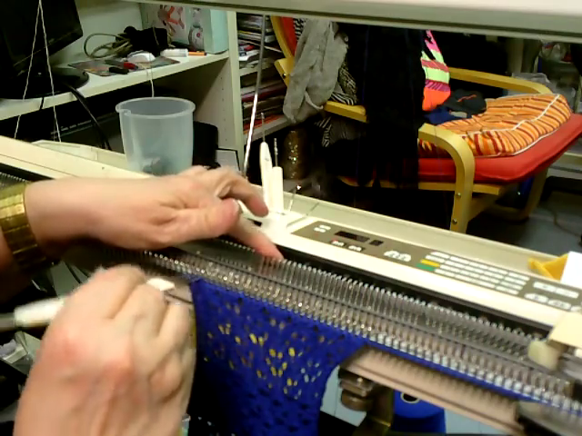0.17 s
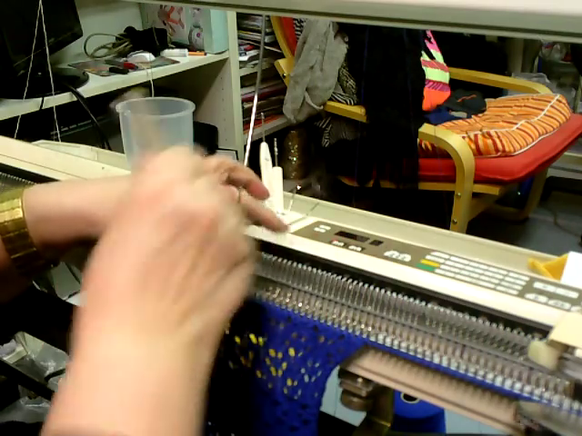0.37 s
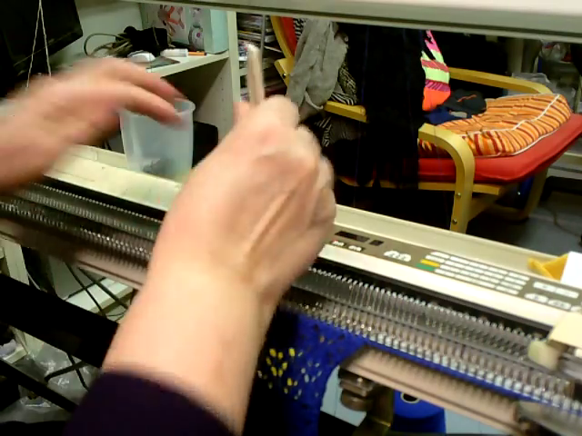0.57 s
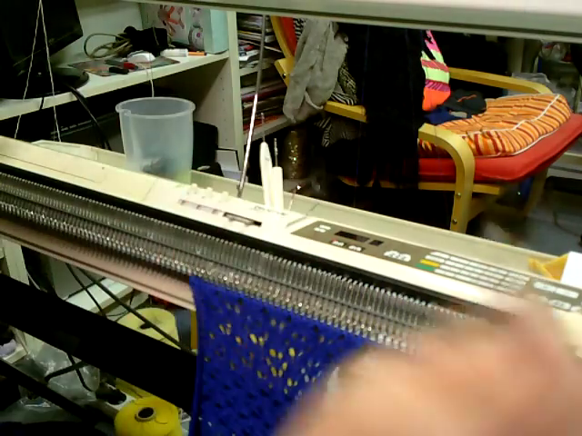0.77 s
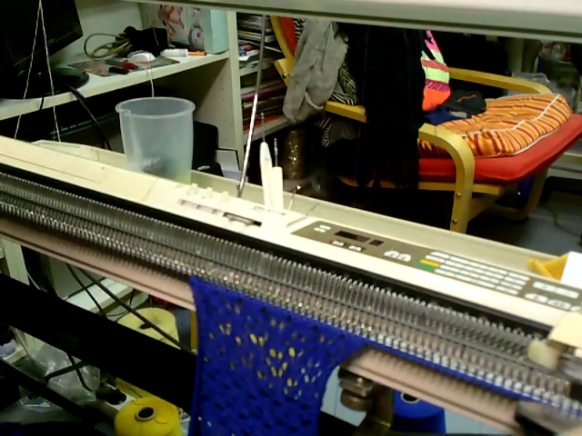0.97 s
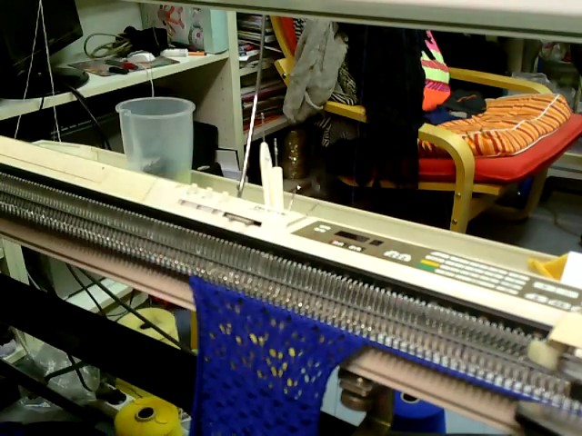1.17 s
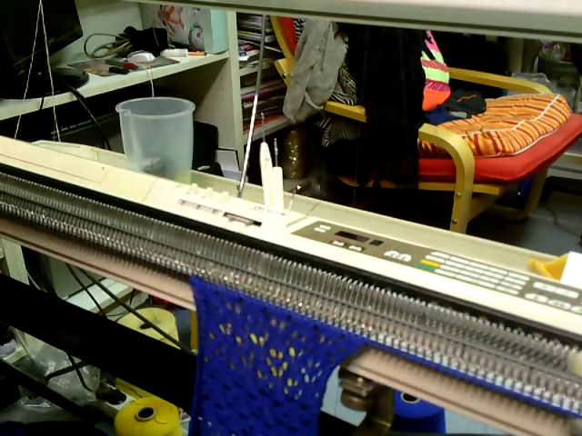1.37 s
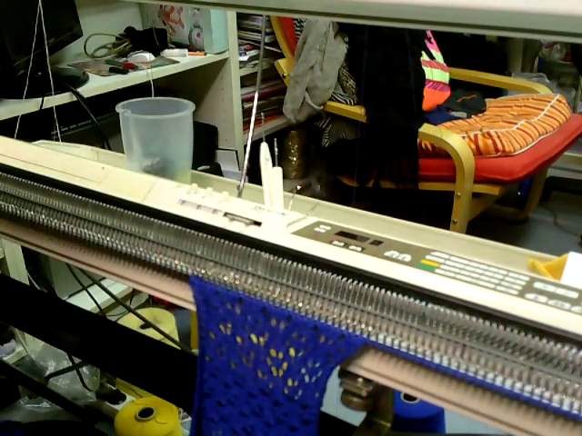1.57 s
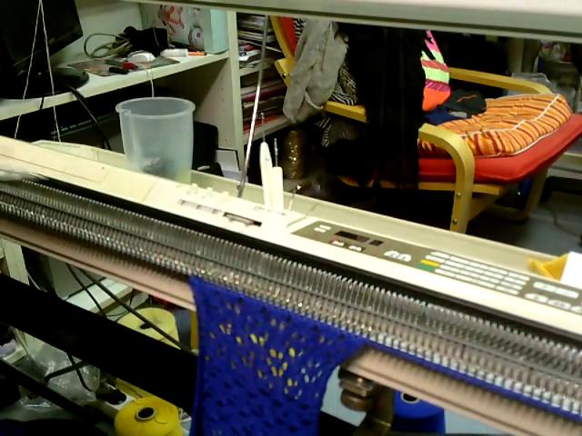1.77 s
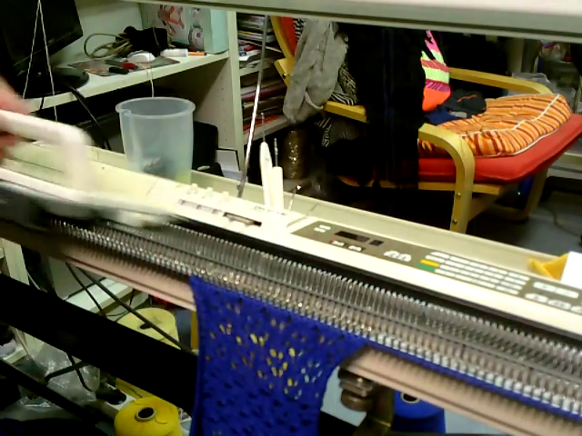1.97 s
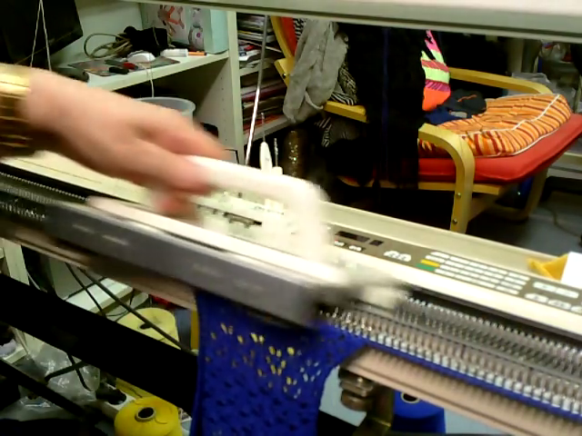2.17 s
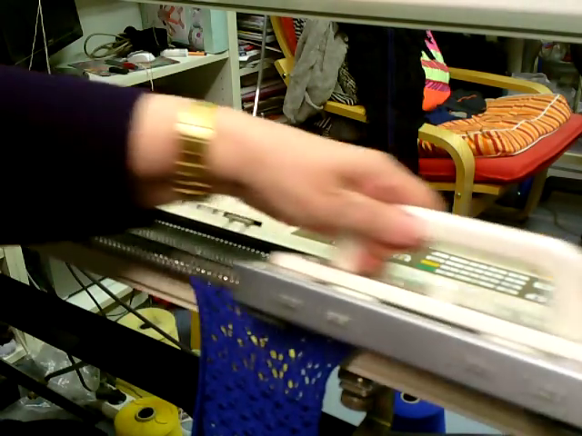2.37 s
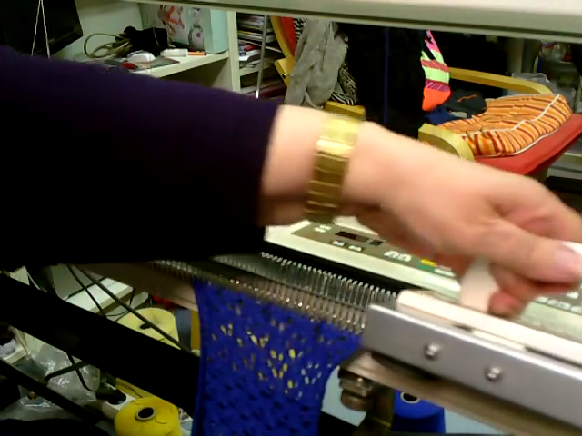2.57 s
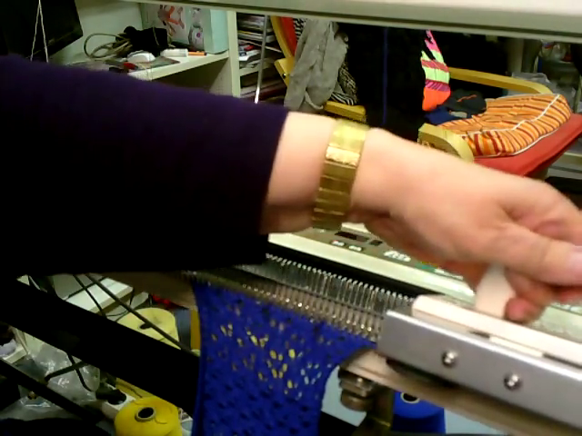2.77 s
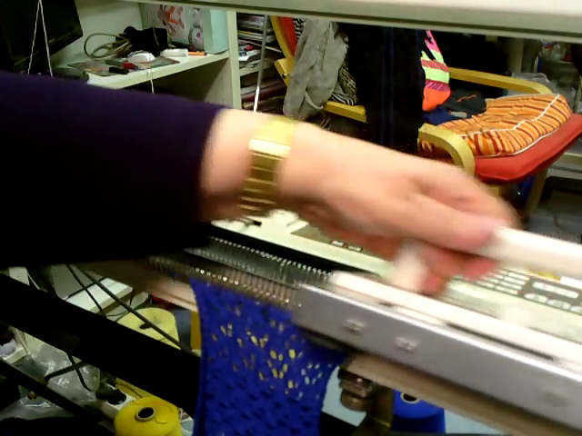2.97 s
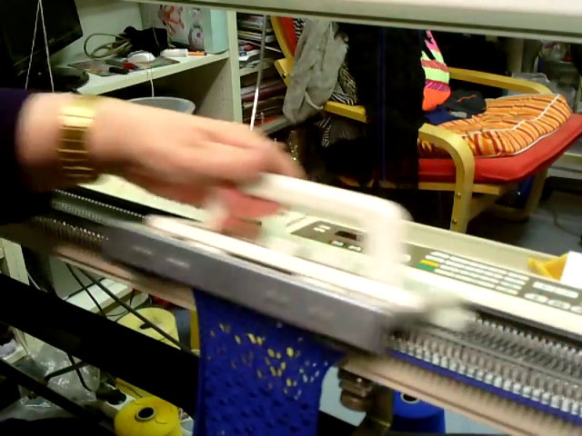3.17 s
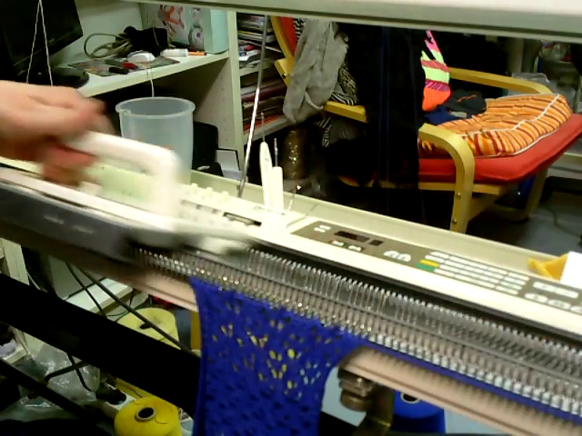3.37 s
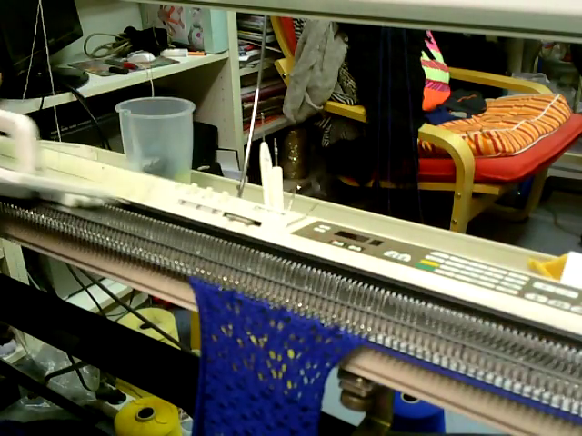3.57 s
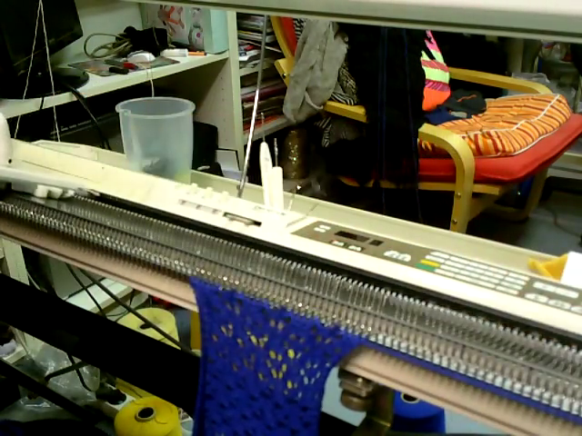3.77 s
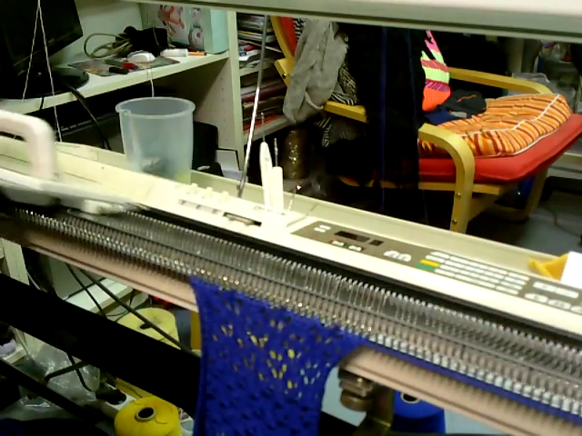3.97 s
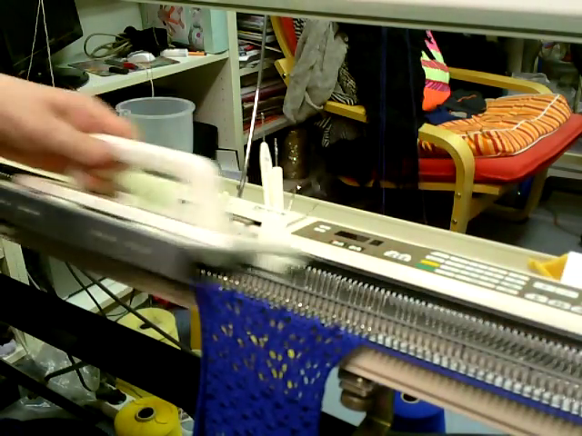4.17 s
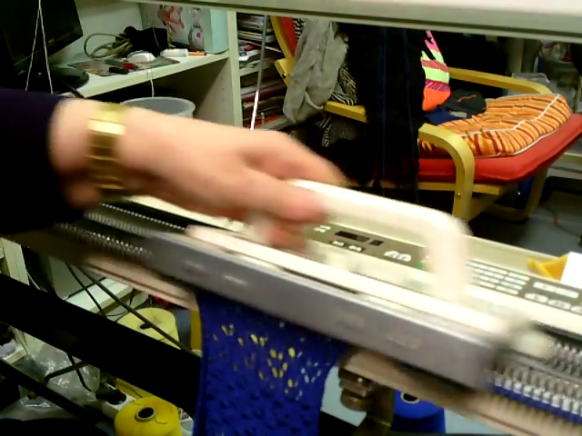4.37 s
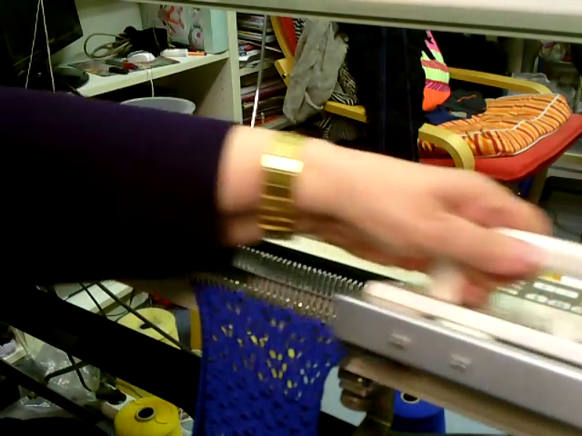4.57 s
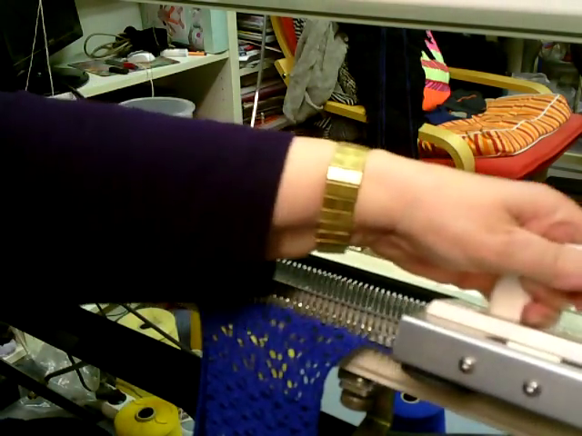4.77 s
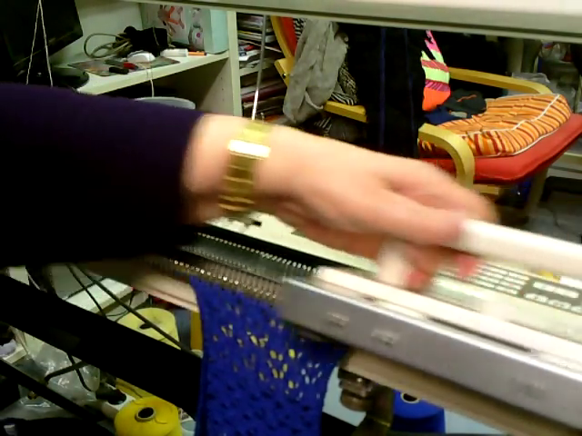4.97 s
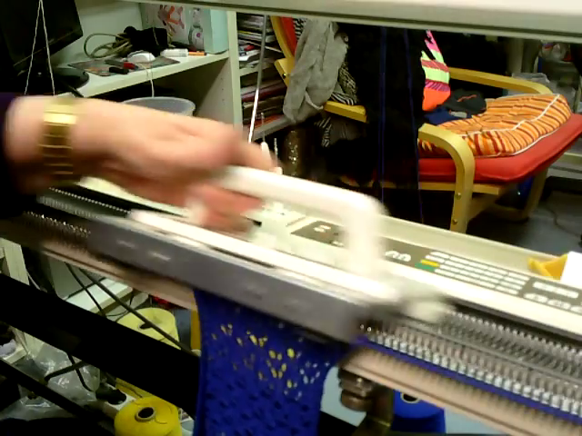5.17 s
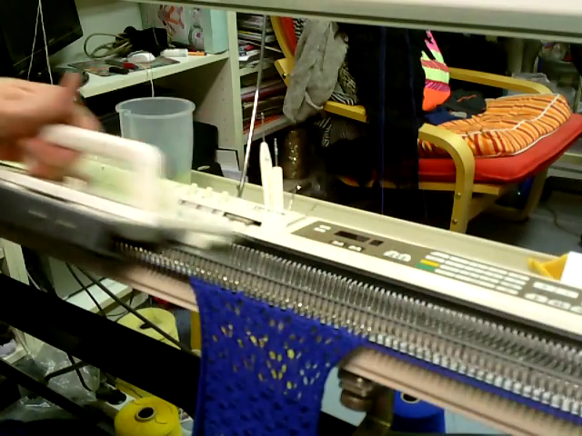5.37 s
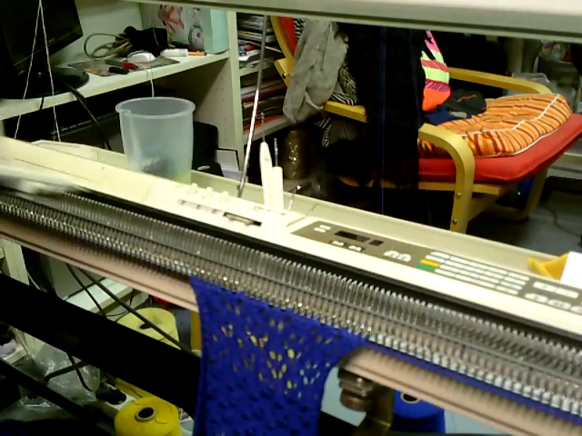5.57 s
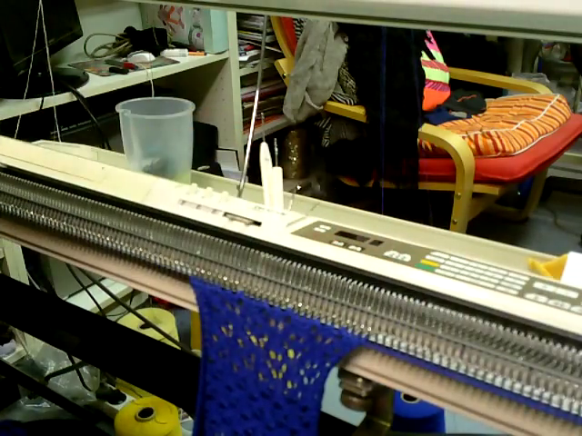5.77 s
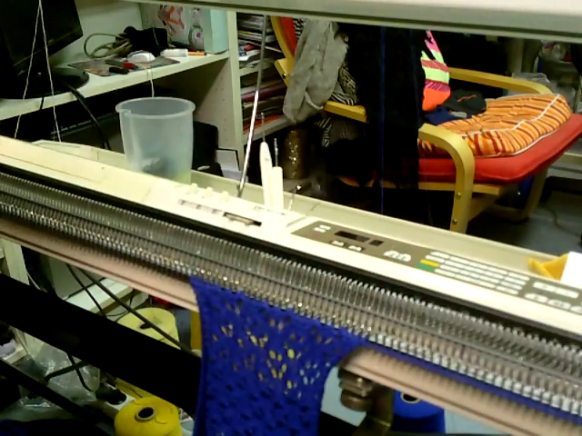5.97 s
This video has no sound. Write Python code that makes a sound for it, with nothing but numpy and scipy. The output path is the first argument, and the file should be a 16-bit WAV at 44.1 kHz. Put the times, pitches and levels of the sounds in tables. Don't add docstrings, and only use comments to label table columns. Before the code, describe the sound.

Close and dry indoors: a quiet hush, a faint woolly rustle, then the quick double clack of a tool being put down. A pause with barely audible ticks follows. Then a metal carriage scrapes and rattles across many steel needles, out, back, out faster and back again, buzzing at the needle rate, with bright latch clicks, jolts and dull knocks, before letting go to quiet.

```python
import sys
import numpy as np
from scipy import signal
from scipy.fft import rfft, irfft
from scipy.io import wavfile
from scipy.ndimage import uniform_filter1d, minimum_filter1d

SR = 44100
rng = np.random.default_rng(int(sys.argv[2]) if len(sys.argv) > 2 else 0)


def dump(signal):
    limited = np.clip(np.atleast_2d(signal).T, -1, 1)
    pcm = np.round(limited * 32767).astype(np.int16)
    wavfile.write(sys.argv[1], SR, pcm)


def nominal_scale(level):
    x = np.asarray(level, float) / 20
    return 10 ** x


N = 265903

# f/Hz, level/dB (per Hz)
NEEDLE_TONE = [(2350, -54), (4000, -4.5), (4470, -12), (5700, -2.5), (6250, 3), (8210, -3.5), (9220, -1),
               (12300, -2.5), (15400, -9), (15700, -15), (16000, -74)]
# f/Hz, level/dB (per Hz)
SCRAPE_TONE = [(760, -44), (1300, -2.5), (1440, -11), (1660, -6), (2130, -0.5), (3030, -1.5), (3350, -0.5),
               (4440, -12), (5000, -9), (6500, -5), (11000, -120)]
# f/Hz, level/dB (per Hz)
BED_TONE = [(24, -101), (40, -71), (81, -41.5), (167, -33), (214, -25), (280, -25), (322, -17), (383, -16),
            (477, -6.5), (663, -15), (813, -6), (894, -8), (1030, 1.5), (1360, -12), (1700, -13.5),
            (2210, -20), (3740, -120)]


def carriage():
    rattle_db, scrape_db, drone_db, rumble_db = minimum_filter1d(parts_db(), size=150) + lift()
    beat_db = needle_beat()
    judder_db = 1.1 * drift(35)

    impacts = contacts(per_s=5000, spread_db=3.0, smooth=1.0)
    rattle = colour(impacts * nominal_scale(rattle_db - 1.5 + beat_db + judder_db), NEEDLE_TONE)
    scrape_gain_db = scrape_db - 0.5 + 0.43 * beat_db + judder_db + 1.13 * drift(55)
    scrape = colour(impacts * nominal_scale(scrape_gain_db), SCRAPE_TONE)
    rings = latches(nominal_scale(0.56 * rattle_db + 0.4 * scrape_db - 2.5 + beat_db + judder_db))

    knocks = contacts(per_s=700, spread_db=2.0, smooth=1.0)
    drone = colour(knocks * nominal_scale(drone_db + 0.37 + 0.9 * beat_db + judder_db), BED_TONE)
    rumble = colour(knocks[::-1] * nominal_scale(rumble_db + 9.0 + 0.38 * judder_db), BED_TONE)
    table_top_hz = 650
    above = signal.butter(4, table_top_hz, "high", fs=SR, output="sos")
    below = signal.butter(4, table_top_hz, "low", fs=SR, output="sos")
    return rattle + scrape + rings + signal.sosfilt(above, drone) + signal.sosfilt(below, rumble)


# t/s, push level/dB, share of the cams filled with needles (0-1)
PUSH = [
    [(1.33, -76, 0.1), (1.46, -44.5, 0.33), (1.58, -34.5, 0.2), (1.64, -28, .3), (1.85, -22.5, 0.4),
     (2.19, -24, 0.87), (2.48, -27, 0.81), (2.69, -40.5, 0.3), (2.78, -66.5, .05)],
    [(2.886, -75, 0.1), (2.916, -45.5, 0.35), (3.006, -32.5, 0.24), (3.026, -24, 0.96),
     (3.335, -26.5, 0.95), (3.38, -32.5, 0.74), (3.65, -32.5, 0.58), (3.73, -35.5, 0.53),
     (3.79, -54.5, 0.67)],
    [(3.866, -59.5, 0.7), (3.9, -38, 0), (3.98, -36.5, 0.4), (4.0, -25, 0.04), (4.3, -23.5, 0.82),
     (4.576, -30.5, 0.75), (4.65, -39, 0.4), (4.73, -41, 0), (4.83, -70, .05)],
    [(4.87, -64, .05), (4.912, -46.5, 0.35), (4.992, -32.5, 0.25), (5.012, -24, 0.93), (5.33, -27, 0.94),
     (5.39, -32.5, 0.73), (5.636, -29, 0.45), (5.84, -33.5, 0.47), (5.95, -51, .05)],
    [(5.98, -53.5, .05), (6.03, -44, 0.2)],
]
# level/dB at an easy push, share of the push followed, gain with full cams/dB, share of the weight felt
RATTLE = (-39.5, 1.1773, 13, -0.5)
SLIDE = (-31.5, 1, -0.5, 0)
DRONE = (-31.5, 0.83, -3.5, 0.84)
RUMBLE = (-38, 0.64, -7.5, 1.5)


def parts_db():
    push_db, filled = in_time([row for stroke in PUSH for row in stroke], outside=-99)
    filled = np.clip(filled, 0, 1)
    easy_push_db = -32
    _, _, weight_db, _ = travel()
    levels = []
    for level_db, follows, full_db, bears in (RATTLE, SLIDE, DRONE, RUMBLE):
        levels.append(level_db + follows * (push_db - easy_push_db) + full_db * filled + bears * weight_db)
    return levels


# start t/s, end t/s, top speed/needles per s, roundness of the speed arch,
# weight on the bed level/dB
STROKES = [
    (1.33, 2.83, 190, 1.08, 1.5),
    (2.83, 3.84, 172, .68, 1.5),
    (3.84, 4.83, 270, 1.2, -1),
    (4.83, 6.02, 213, 0.65, 0),
]
# t/s, extra beat depth level/dB
ENTRIES = [
    (1.6237, 1.5),
    (3.0285, 10),
    (3.992, 1.5),
    (5.0165, 9),
]


def travel():
    start, end, top, roundness, weight_db = np.transpose(STROKES)
    entry, extra_db = np.transpose(ENTRIES)
    creep_per_s, fill_s = 23, 0.085
    t = np.arange(N) / SR
    k = np.clip(np.searchsorted(start, t) - 1, 0, None)
    turn = np.pi * np.clip((t - start[k]) / (end - start)[k], 0, 1)
    arch = np.sin(turn) ** roundness[k]
    per_s = np.maximum(top[k] * arch, creep_per_s)

    few_db = extra_db[k] * (t > entry[k]) * np.exp(-np.abs(t - entry[k]) / fill_s)
    depth_db = 1.5 * (top[k] / per_s) ** 0.78 + few_db

    overhang_db = 1
    far = np.cos(turn) * (-1) ** k / 2
    return per_s, depth_db, weight_db[k] + overhang_db * far, (entry[k] * SR).astype(int)


def needle_beat():
    per_s, depth_db, _, entry = travel()
    needles = np.cumsum(per_s * (1 + 0.03 * drift(40))) / SR
    needles = needles - needles[entry] % 1 + 1
    strength = 0.072 * rng.standard_normal(N // 50)[needles.astype(int)]
    saw = 1 - 2 * (needles % 1)
    beat_db = uniform_filter1d(depth_db * (saw + strength), size=60)
    return beat_db - 10 * np.log10(uniform_filter1d(nominal_scale(2 * beat_db), size=2000))


def contacts(per_s, spread_db, smooth):
    sizes = nominal_scale(spread_db * np.minimum(rng.exponential(1, N), 4.2)) * rng.choice([-1, 1], N)
    hits = rms_one(sizes * (rng.random(N) < per_s / SR))
    return rms_one(hits + smooth * rng.standard_normal(N))


# f/Hz, level/dB, time to fall 60 dB t/s
LATCHES = [(2153, -8.5, 0.098), (2594, -1.5, 0.037), (3190, -5, 0.032), (3280, -1, 0.026),
           (3570, 0.5, 0.018), (5530, -1, 0.015), (6300, -11, 0.051), (6530, -5.5, 0.014),
           (8300, -2, 0.011), (8900, -0.5, 0.029), (11200, -34, .01), (11900, -2, 0.011)]


def latches(gain):
    taps = gain * contacts(per_s=1400, spread_db=3.0, smooth=0)
    dealt = rng.integers(0, len(LATCHES), N)
    out = np.zeros(N)
    for k, (hz, level_db, t60) in enumerate(LATCHES):
        r = nominal_scale(-60 / (t60 * SR))
        w = 2 * np.pi * hz / SR
        part_gain = nominal_scale(level_db + 6.3 * np.tanh(drift(2.9)))
        struck = taps * (dealt == k) * part_gain * np.sqrt(1 - r * r)
        out += signal.lfilter([0.5, 0, -0.5], [1, -2 * r * np.cos(w), r * r], struck + 1e-18)
    return out


# free t/s, stall t/s, level/dB
STALLS = [
    (1.5255, .02, -3.5),
    (1.594, .02, -4),
    (2.6495, 0.025, -6),
    (2.9385, 0.014, -5),
    (2.9622, .015, -2),
    (3.702, 0.041, -8),
    (3.992, .02, -1),
    (4.057, 0.016, -3.5),
    (4.9154, .015, -3),
]


def lift():
    free, t = np.zeros(N), np.arange(N) / SR
    lift_db, lift_s = -4.5, 0.004
    for s, *_ in all_blows():
        free[round((s - lift_s) * SR):round(s * SR)] = lift_db
    for s, stall_s, level_db in STALLS:
        free += level_db * np.clip(1.9 * (1 + (t - s) / stall_s), 0, 1) * (t < s)
    return uniform_filter1d(free, size=50)


# top level/dB, body level/dB, thud level/dB (all relative to the peak), decay t/s
TICK = (-7, -7, -13, 0.17)
FLIP = (-21, -11, -15, .024)
TRIP = (-5.5, -13, -16, .019)
THUMP = (-16, -14, 8.5, 0.06)
SNAP = (-4, -13, -24, 0.03)
CLACK = (-4, -19, -3.5, 0.04)
KNOCK = (-15, -2, 3.5, 0.02)
CRASH = (2, -3, -10, .02)
SCUFF = (1.5, 5, -6, 0.04)
# t/s, peak level/dB, ring f/Hz
TICKS = [
    (.7094, -54, 2600),
    (.734, -47, 2940),
    (.7484, -53, 2540),
    (.9594, -52, 3540),
    (1.384, -38, 5400),
    (1.411, -43, 3670),
    (1.4242, -35.5, 3130),
    (1.555, -32, 2800),
    (1.594, -21.5, 2800),
]
# t/s, peak level/dB, ring f/Hz
FLIPS = [
    (2.8478, -31.5, 2250),
    (4.8534, -27, 2180),
]
# t/s, peak level/dB, ring f/Hz
TRIPS = [
    (2.578, -9, 3500),
    (4.653, -12.5, 3470),
    (2.9174, -29.5, 3160),
    (3.8815, -33, 5000),
]
# t/s, peak level/dB, ring f/Hz
THUMPS = [
    (3.8143, -42.5, 1200),
    (4.7538, -36, 1100),
    (6.0098, -30, 1050),
]
# t/s, peak level/dB, ring f/Hz
SNAPS = [
    (1.7986, -16, 2350),
    (2.513, -27, 3190),
    (3.122, -10, 3300),
    (3.1696, -5.5, 3330),
    (4.3655, -7, 3300),
    (5.388, -15, 3140),
    (3.0686, -5, 3700),
]
# t/s, peak level/dB, ring f/Hz
CLACKS = [(1.703, -19, 2660), (2.6021, -29, 2940), (2.9372, -31, 2060), (2.9624, -22, 2650),
          (3.0112, -14.5, 3550), (3.542, -20, 3250), (3.9274, -26.5, 3120), (4.0574, -16, 2630),
          (4.7117, -31, 2217), (4.9156, -28, 3220), (4.949, -26, 3300), (5.0002, -21, 3240),
          (5.0064, -12, 3280), (6.0214, -37, 2730)]
# t/s, peak level/dB, ring f/Hz
KNOCKS = [(1.153, -52, 3020), (3.6432, -19, 1100), (1.621, -13.5, 905), (1.4573, -28, 2010),
          (1.4727, -27, 2610), (1.5025, -35, 2150), (2.4854, -16.5, 3280), (2.6245, -42, 1830),
          (2.6493, -20, 1300), (2.9083, -35.5, 2030), (3.7023, -20.5, 1120), (3.8932, -28, 1120),
          (3.992, -23, 2220), (4.8918, -39, 2150), (4.9745, -26, 1830), (5.7048, -21, 3120)]
# t/s, peak level/dB, ring f/Hz
CRASHES = [
    (3.0293, -6, 3240),
    (3.7265, -25, 2410),
    (4.246, -14, 2300),
    (4.388, -12, 3300),
    (4.4122, -10.5, 7500),
    (4.437, -14, 3300),
    (5.016, -12, 3320),
]
# t/s, peak level/dB, ring f/Hz
SCUFFS = [
    (1.273, -47, 2800),
    (1.5255, -16, 2660),
    (3.338, -14, 2960),
    (5.3245, -13.5, 6500),
    (5.906, -26, 5140),
    (4.553, -23, 2600),
    (3.709, -28.5, 2500),
]


def all_blows():
    kinds = ((TICK, TICKS), (FLIP, FLIPS), (TRIP, TRIPS), (THUMP, THUMPS), (SNAP, SNAPS),
             (CLACK, CLACKS), (KNOCK, KNOCKS), (CRASH, CRASHES), (SCUFF, SCUFFS))
    return [tuple(row) + tuple(kind) for kind, rows in kinds for row in rows]


def clicks():
    length = 9000
    ring, body, top, thud = np.zeros((4, N + length))
    ring_width_hz = 320
    r = np.exp(-np.pi * ring_width_hz / SR)
    for s, peak_db, hz, top_db, body_db, thud_db, decay_s in all_blows():
        start = round(s * SR)
        at = slice(start, start + length)
        crack = nominal_scale(peak_db - 8) * burst(rng.standard_normal(length), decay_s)
        push = nominal_scale(-17.5) * crack
        push[12] += nominal_scale(peak_db - 9.5)
        w = 2 * np.pi * hz / SR
        ring[at] += signal.lfilter([1, 0, -1], [1, -2 * r * np.cos(w), r * r], push)
        body[at] += nominal_scale(body_db) * crack
        top[at] += nominal_scale(top_db + 4.0) * crack
        thud[at] += nominal_scale(thud_db + 4.5) * crack
    return (ring + colour(body, SCRAPE_TONE) + colour(top, NEEDLE_TONE) + colour(thud, BED_TONE))[:N]


def burst(noise, decay_s):
    t = np.arange(len(noise)) / SR
    tail_db, tail_t60_s = -17.5, 0.2
    tail = nominal_scale(tail_db - 60 * t / tail_t60_s) * np.minimum(t / 0.01, 1)
    dull = signal.lfilter(*signal.butter(1, 4000, fs=SR), noise[::-1])
    direct = nominal_scale(-60 * t / max(decay_s, 0.004)) * np.minimum(t / 0.0007, 1)
    return noise * direct + dull * tail


# t/s, peak level/dB, decay t/s
HANDLE_HITS = [
    (.5068, -43, 0.0092),
    (.5162, -23.5, 0.04),
    (.519, -26, 0.021),
    (.5235, -23.5, 0.024),
]
# t/s, peak level/dB, decay t/s
TIP_HITS = [
    (.5288, -10.5, 0.01),
    (.5325, -43, 0.046),
    (.5375, -27.5, .05),
]
# f/Hz, level/dB (per Hz)
HANDLE_TONE = [(88, -52), (150, -29), (457, 0), (837, -12), (1140, 5.5), (1390, -10), (2760, -12),
               (3420, -3), (4490, -25), (5460, -1), (9630, -18), (11900, -3), (15100, -15), (16000, -33)]
# f/Hz, level/dB (per Hz)
TIP_TONE = [(88, -52), (150, -28), (457, -0.5), (1080, -9.5), (1240, -14), (1760, -12.5), (2920, -3.5),
            (3700, -2), (4760, -4), (6020, -13.5), (11700, -5), (15100, -8), (16000, -26)]


def tool():
    out = np.zeros(N)
    for hits, tone in ((HANDLE_HITS, HANDLE_TONE), (TIP_HITS, TIP_TONE)):
        for s, peak_db, decay_s in hits:
            start = round(s * SR)
            hit = burst(rng.standard_normal(9000), decay_s)
            out[start:start + 9000] += nominal_scale(peak_db) * colour(hit, tone)
    return out


# f/Hz, level/dB (per Hz)
RUSTLE_TONE = [(400, -20), (900, -2), (1500, -2), (2500, -8), (5000, -19)]


def yarn():
    middle_s, span_s, level_db = 0.43, 0.1, -59
    swell_db = -5.0 * ((np.arange(N) / SR - middle_s) / span_s) ** 2
    return colour(rng.standard_normal(N) * nominal_scale(level_db + swell_db + 2.5 * drift(25)), RUSTLE_TONE)


# f/Hz, level/dB (per Hz)
AIR_TONE = [(18, -52), (30, -25.5), (233, -8), (336, -5.5), (666, -3), (801, -5), (866, -2), (1910, -5.5),
            (2060, -6), (5900, -12), (11700, -14.5), (14800, -17), (16000, -27)]


def room_air():
    return nominal_scale(-58) * colour(rng.standard_normal(N), AIR_TONE)


def rms_one(x):
    return x / np.sqrt(np.mean(x ** 2) + 1e-20)


def in_time(rows, outside=None):
    s, *columns = np.transpose(rows)
    return [np.interp(np.arange(N) / SR, s, c, outside, outside) for c in columns]


def colour(x, spectrum):
    first_hz, first_db = spectrum[0]
    points = [(first_hz / 8, first_db - 40)] + list(spectrum)
    hz, level_db = np.transpose(points)
    grid = np.arange(2049) * SR / 4096 + 1
    cepstrum = irfft(np.interp(np.log(grid), np.log(hz), level_db) * np.log(10) / 20)
    cepstrum[1:2048] *= 2
    cepstrum[2049:] = 0
    kernel = irfft(np.exp(rfft(cepstrum)))
    return signal.fftconvolve(x, kernel / np.linalg.norm(kernel))[:len(x)]


def drift(rate):
    r = np.exp(-2 * np.pi * rate / SR)
    slow = signal.lfilter([1], [1, -2 * r, r * r], rng.standard_normal(N + SR))[SR:]
    return rms_one(slow)


def scene():
    no_bass = signal.butter(2, 97, "high", fs=SR, output="sos")
    machine = signal.sosfilt(no_bass, carriage() + clicks() + tool())
    return (machine + room_air() + yarn())[None]


def low_pass(x):
    return signal.sosfilt(signal.butter(12, 16610, fs=SR, output="sos"), x)


def record(dry):
    limit, cutoff_hz = 0.66, 16000
    allowed = np.minimum(1, limit / (np.abs(dry) + 1e-9))
    gain = uniform_filter1d(minimum_filter1d(allowed, size=121), size=61)
    steep = signal.cheby2(12, 50, cutoff_hz, fs=SR, output="sos")
    mix = signal.sosfilt(steep, gain * dry)
    return low_pass(mix)


dry = scene()
out = record(dry)
dump(out)
```